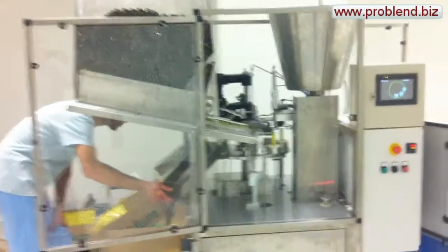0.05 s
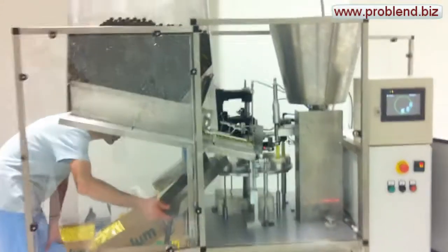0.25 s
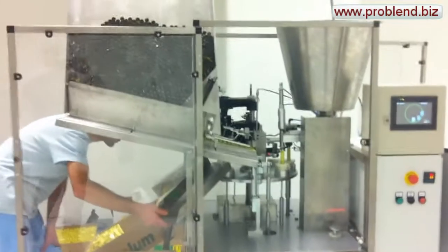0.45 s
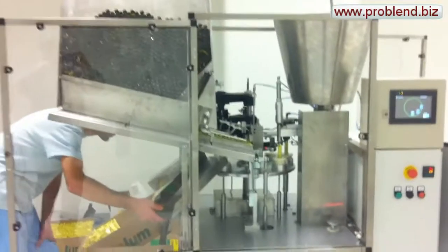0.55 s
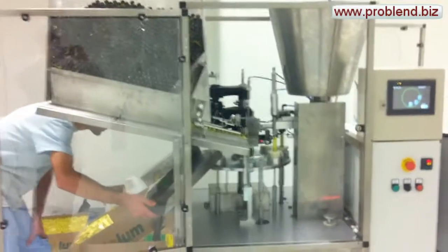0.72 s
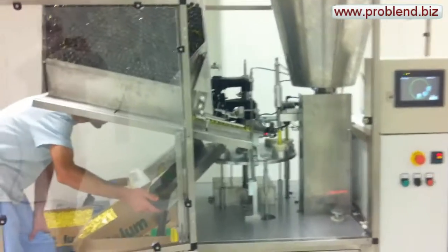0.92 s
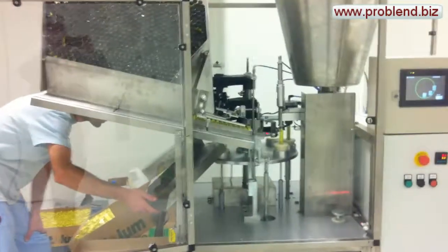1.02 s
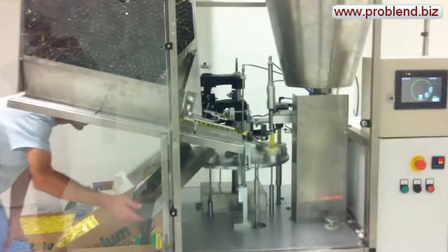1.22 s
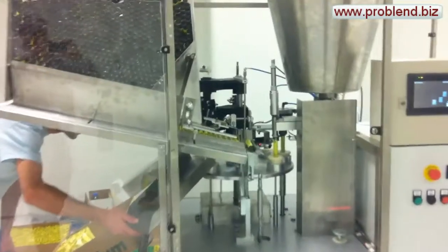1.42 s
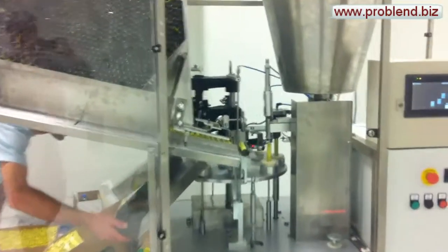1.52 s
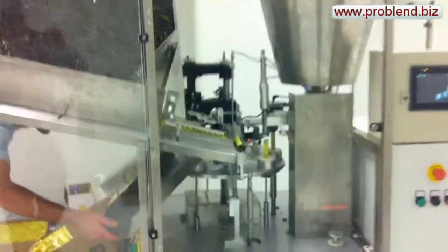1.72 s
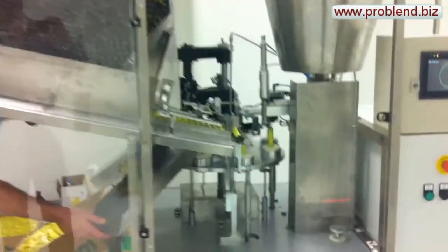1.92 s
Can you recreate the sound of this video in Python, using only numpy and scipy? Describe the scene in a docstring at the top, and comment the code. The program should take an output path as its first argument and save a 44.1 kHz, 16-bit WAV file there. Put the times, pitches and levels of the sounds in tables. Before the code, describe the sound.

Loud air hiss from a running filling machine, following a knock and brief metallic chatter.

```python
"""A drive's rumble and a thin whine come first: a pneumatic filling machine cycles in a hard-walled
workshop, heard at one microphone. An air line starts to fizz, a cylinder knocks on its stop and a steel
part is struck and chatters. Then a valve vents: a loud hiss rings in its port near 2 kHz, glances off
nearby panels, holds, and fades as the pressure falls."""
import sys
import numpy as np
from scipy import signal
from scipy.fft import rfft, irfft, next_fast_len
from scipy.io import wavfile
from scipy.ndimage import uniform_filter1d, map_coordinates

SR = 44100
rng = np.random.default_rng(int(sys.argv[2]) if len(sys.argv) > 2 else 0)


def generate_wav(signal):
    """Clip the signal to [-1, 1] and save it as 16-bit WAV at the path in sys.argv[1]."""
    frames = np.transpose(np.atleast_2d(signal))
    scaled = np.clip(frames, -1, 1) * 32767
    pcm = np.round(scaled).astype(np.int16)
    wavfile.write(sys.argv[1], SR, pcm)


N = 85995


def valve_vent():
    """A spurt, then air hisses through the ringing port under a bright jet; all flutter together."""
    # flow through the port (time [s], hiss level [dB], ring over the hiss [dB])
    flow = [(.622, -32.5, -2), (.668, -19, -9), (0.719, -17.5, 4), (.79, -14, 1), (.92, -14, 0),
            (.99, -16, -1), (1.07, -14.5, 2), (1.14, -14, 1.5), (1.175, -18.5, 1), (1.21, -17, 3.5),
            (1.27, -19.5, -4), (1.34, -22.5, 2.5), (1.46, -26, 0), (1.58, -26, -6), (1.7, -32, -3),
            (1.95, -38, -10)]
    # main resonances of the port (frequency [Hz], width [Hz], level [dB])
    ring_peaks = [(1989, 86, 2), (2107, 31, -3), (2130, 64, -9.5)]
    # weaker resonances of port and guard (frequency [Hz], width [Hz], level [dB])
    port_peaks = [(670, 73, -11.5), (900, 100, -25), (1510, 90, -26), (2365, 140, -7), (2690, 92, -4.5),
                  (3220, 280, -17.5), (3640, 130, -13)]
    # broad hiss of the port (frequency [Hz], level [dB])
    hiss_colour = [(60, -65), (200, -63), (480, -40), (600, -24), (1100, -19), (1300, -18.5), (1800, -12.5),
                   (2200, -7), (2800, -9.5), (3800, -16), (5000, -27), (9000, -60)]
    # the jet's treble (time [s], level [dB])
    jet_levels = [(.6, -39), (.66, -22), (.76, -20.5), (.92, -20), (1.0, -21.5), (1.1, -20.5), (1.22, -22),
                  (1.3, -25.5), (1.42, -29), (1.56, -35.5), (1.68, -42.5), (1.95, -43.5)]
    # its spectrum (frequency [Hz], level [dB])
    jet_colour = [(2500, -47), (3800, 1), (4800, 1), (5800, -6), (6800, -0.5), (7200, -0.5), (7700, -3.5),
                  (8500, 4), (9300, 5), (10500, -1.5), (12500, -2.5), (14000, -4)]
    # short held spurt as the valve opens (time [s], level [dB])
    spurt_levels = [(.63, -34), (.664, -12), (.694, -11.5), (.725, -18.5), (.9, -66)]
    # its resonances (frequency [Hz], width [Hz], level [dB])
    spurt_peaks = [(1630, 200, -6), (2150, 160, -1), (2490, 130, 0), (2750, 400, -19)]
    flow_gain = level([(s, db) for s, db, _ in flow])
    ring_gain = flow_gain * level([(s, over) for s, _, over in flow])
    hiss = flow_gain * noise(lambda hz: np.hypot(resonances(port_peaks)(hz), colour(hiss_colour)(hz)))
    ring = ring_gain * noise(resonances(ring_peaks), patchy_db=0)
    jet = level(jet_levels) * noise(colour(jet_colour), patchy_db=4)
    spurt = level(spurt_levels) * noise(resonances(spurt_peaks), patchy_db=3)
    flutter = amp(0.35 * wobble(rate=28))
    return flutter * (ring + panels(hiss + jet) + spurt)


def panels(x, longest_s=.012, echo_db=-7):
    """Steel and glass near the valve add short echoes that comb the sound, less so below 4 kHz."""
    delays = rng.uniform(longest_s / 10, longest_s, size=8)
    gain = amp(echo_db) / np.sqrt(len(delays))
    echoes = lambda hz: sum(np.exp(-2j * np.pi * hz * d) for d in delays)
    return filtered(x, lambda hz: 1 + gain * np.minimum(hz / 4000, 1) * echoes(hz))


def cylinder():
    """The mechanism thuds as it starts to move, and the cylinder's knocks ring the frame."""
    # cylinder strokes (time [s], level [dB], attack [s], t60 [s])
    knocks = [(.183, -29.5, 0.0036, 0.5), (.2465, -13, 0.0023, 0.14), (.275, -24, 0.012, 1.93),
              (.361, -16, 0.0011, 0.027)]
    # frame resonances (frequency [Hz], width [Hz], level [dB])
    frame_peaks = [(640, 150, -13), (1524, 96, 1.5), (1940, 200, -14), (2130, 290, 0.5), (2500, 220, -5),
                   (2950, 200, -12)]
    # low thuds (time [s], level [dB], attack [s], t60 [s])
    thuds = [(.247, -24.5, 0.0034, 0.42), (.305, -26.5, 0.007, 0.42), (1.32, -23, 0.0053, .22),
             (1.85, -27, .01, 0.37)]
    # their resonances (frequency [Hz], width [Hz], level [dB])
    thud_peaks = [(169, 34, -19), (255, 30, 11.5), (336, 44, -19)]
    return bursts(knocks, resonances(frame_peaks)) + bursts(thuds, resonances(thud_peaks))


def steel_chatter():
    """A struck steel part rings near 5 kHz at each contact."""
    # contacts (time [s], level [dB], attack [s], t60 [s])
    contacts = [(.311, -39, .002, 0.19), (.3612, -17.5, 0.00034, 0.055), (.376, -22, 0.0056, 0.33),
                (.412, -24, 0.0027, 0.51), (.448, -26, 0.0029, 0.3), (.492, -32, 0.0037, 0.67),
                (.565, -33.5, 0.0047, 1)]
    # resonances of the part (frequency [Hz], width [Hz], level [dB])
    steel_peaks = [(4830, 100, 0), (5120, 110, -12)]
    return bursts(contacts, resonances(steel_peaks))


def air_line():
    """The line opens with a crisp spray, and escaping air keeps up a high fizz."""
    # fizz of the line (time [s], level [dB])
    fizz_levels = [(0, -69), (.07, -49), (.088, -34), (.16, -33.5), (.25, -31), (.31, -27.5), (.35, -32.5),
                   (.375, -25.5), (.43, -33), (.49, -38.5), (.53, -31.5), (.56, -39), (.62, -33),
                   (1.55, -32), (1.69, -40.5), (1.8, -35), (1.95, -47)]
    # its spectrum (frequency [Hz], level [dB])
    fizz_colour = [(1000, -39), (2200, 9), (3500, 6), (5500, 5), (7500, -3.5), (8600, 7.5), (10000, 2),
                   (12000, -5), (14000, -31)]
    # sprays of air (time [s], level [dB], attack [s], t60 [s])
    sprays = [(.077, -25, .006, 0.64), (.18, -25, .01, 0.54), (1.7, -30.5, 0.046, .9)]
    # their spectrum (frequency [Hz], level [dB])
    spray_colour = [(1500, -23), (4500, -11), (7000, 2.5), (9000, 5.5), (11500, 3), (14000, 5.5)]
    fizz = level(fizz_levels) * noise(colour(fizz_colour), patchy_db=4)
    return fizz + bursts(sprays, colour(spray_colour))


def valve_puffs():
    """Small valves let out short puffs of air."""
    # puffs (time [s], level [dB], attack [s], t60 [s])
    puffs = [(.361, -38, .001, 0.042), (.565, -25, 0.0019, 0.11), (1.322, -20.5, 0.0037, 0.61),
             (1.558, -23.5, 0.0044, 0.31)]
    # their spectrum (frequency [Hz], level [dB])
    puff_colour = [(80, -38), (250, 1), (700, 1), (1500, 10.5), (3000, -2), (5000, 0), (9000, -0.5),
                   (14000, -14)]
    return bursts(puffs, colour(puff_colour))


def drive():
    """The running machine behind it all: rumble, midrange rush, two frame tones and a thin whine."""
    # the drive's rumble (time [s], level [dB])
    rumble_levels = [(0, -35), (.17, -36.5), (.23, -33), (.47, -30), (.56, -35.5), (.7, -32), (.88, -42),
                     (.97, -46.5), (1.23, -45), (1.31, -35.5), (1.55, -36), (1.75, -33.5), (1.86, -33.5),
                     (1.95, -34)]
    # its spectrum (frequency [Hz], level [dB])
    rumble_colour = [(25, -40), (65, -49), (95, -23), (125, -3), (170, -2.5), (210, -5), (272, 0.5),
                     (325, -1), (400, -9.5), (520, -12), (800, -17), (2000, -70)]
    # the mechanism's rush (time [s], level [dB])
    rush_levels = [(0, -31), (.15, -33.5), (.32, -27.5), (.55, -34.5), (.8, -30), (1.15, -34.5),
                   (1.4, -29.5), (1.6, -31), (1.85, -28.5), (1.94, -30)]
    # its spectrum (frequency [Hz], level [dB])
    rush_colour = [(200, -24), (450, -18.5), (600, -2), (780, -1), (1100, -4.5), (1400, -7.5), (1800, -8.5),
                   (2200, -12.5), (3000, -20), (4500, -29.5), (9000, -34), (14000, -49)]
    # the frame hums as the mechanism moves (time [s], level [dB], attack [s], t60 [s])
    hums = [(-.05, -36.5, .02, 1.7), (.245, -34, 0.017, 3.7), (1.318, -36.5, 0.0047, 14)]
    # a higher tone of the frame (time [s], level [dB], attack [s], t60 [s])
    drones = [(.28, -28, 0.023, 0.75), (.6, -31, 0.015, 1), (.69, -25, 0.018, 0.47),
              (1.53, -29, 0.025, 0.78)]
    rumble = level(rumble_levels) * noise(colour(rumble_colour), patchy_db=1)
    rush = level(rush_levels) * noise(colour(rush_colour), patchy_db=1)
    hum = swells(hums) * tone(hz=264.6, drift_hz=8.13, waver_db=5.5)
    drone = swells(drones) * tone(hz=657, drift_hz=10, waver_db=2.5)
    whine = amp(-48.5) * noise(resonances([(8000, 110, 0)]))  # a narrow band at 8 kHz
    return rumble + rush + hum + drone + whine


def amp(db):
    """Decibels to gain."""
    return 10 ** (np.asarray(db) / 20)


def unit(x):
    """Scale to rms 1."""
    return x / np.sqrt(np.mean(x ** 2) + 1e-20)


def level(rows):
    """Gain per sample from (time [s], level [dB]) points, silent before the first."""
    s, db = np.transpose(rows)
    return amp(np.interp(np.arange(N) / SR, s, db, left=-np.inf))


def swells(rows):
    """Envelope of events that rise and die away, summed in power."""
    t, power = np.arange(N) / SR, np.zeros(N)
    for s, db, attack, t60 in rows:
        age = np.maximum(t - s, 0)
        power += (amp(db - 60 * age / t60) * (1 - np.exp(-age / attack))) ** 2
    return np.sqrt(power)


def wobble(rate):
    """A smooth random curve, rate knots a second."""
    return map_coordinates(rng.standard_normal(1024), [np.arange(N) * rate / SR], mode="wrap")


def tone(hz, drift_hz, waver_db):
    """A sine of rms 1, unsteady in pitch and level."""
    phase = 2 * np.pi * np.cumsum(hz + drift_hz * wobble(rate=34.54)) / SR
    return unit(amp(waver_db * wobble(rate=29.89)) * np.sin(phase))


def colour(points):
    """Response through (frequency [Hz], level [dB]) points on a log axis."""
    f, db = np.transpose(points)
    return lambda hz: amp(np.interp(np.log(hz + 1), np.log(f), db))


def resonances(peaks):
    """Response of steep-sided resonances."""
    return lambda hz: sum(amp(db) / (1 + ((hz - fc) / width * 2) ** 2 / 2) for fc, width, db in peaks)


def filtered(x, response):
    """Pass x through a frequency response."""
    m = next_fast_len(N + SR // 2)
    return irfft(rfft(x, m) * response(np.fft.rfftfreq(m, 1 / SR)), m)[:N]


def noise(response, patchy_db=0.5):
    """Coloured noise of rms 1, with the slowly shifting narrow peaks and dips of a reflective room."""
    spectra = signal.stft(rng.standard_normal(N), nperseg=1024)[2]
    ripple = uniform_filter1d(rng.standard_normal(spectra.shape), size=2, axis=0)  # narrow in frequency
    ripple = uniform_filter1d(ripple, size=30, axis=1)  # slow in time
    patchy = signal.istft(spectra * amp(patchy_db * unit(ripple)), nperseg=1024)[1][:N]
    return unit(filtered(patchy, response))


def bursts(rows, response):
    """Noise in one body, excited by each event in rows."""
    return swells(rows) * noise(response)


def scene():
    """The whole machine from one spot in the workshop, in mono."""
    return (drive() + air_line() + valve_puffs() + cylinder() + steel_chatter() + valve_vent())[None]


def record(dry):
    """The microphone chain rounds off the highest peaks and cuts the deep bass and the top treble."""
    ceiling, low_cut_hz, top_hz = .92, 100, 14080
    rounded = dry[0] / (1 + np.abs(dry[0] / ceiling) ** 10) ** (1 / 10)
    return filtered(rounded, lambda hz: (hz < top_hz) * hz / np.hypot(hz, low_cut_hz))[None]


dry = scene()
out = record(dry)
generate_wav(out)
```